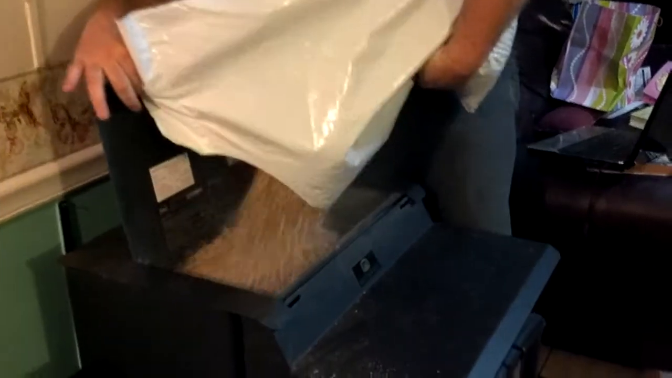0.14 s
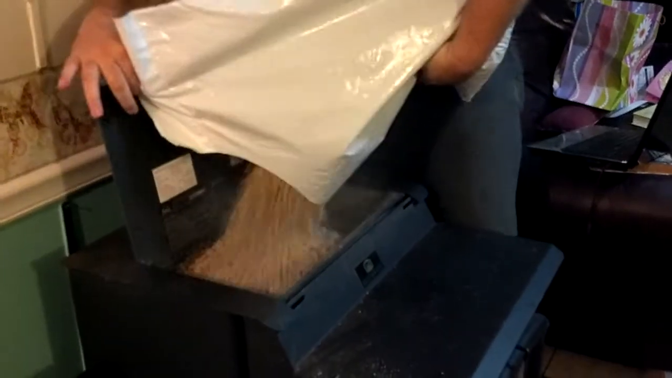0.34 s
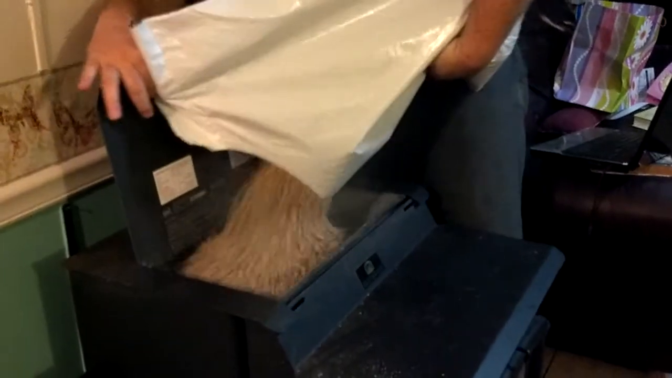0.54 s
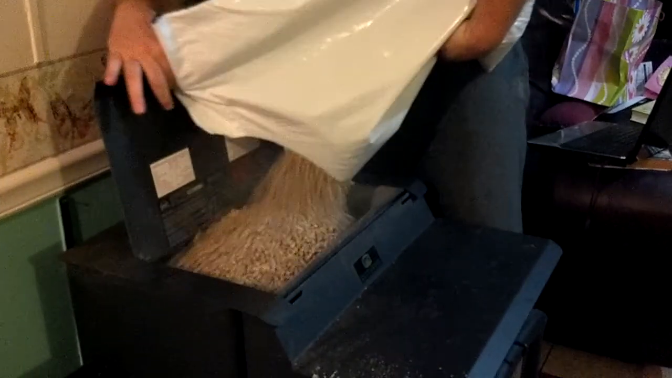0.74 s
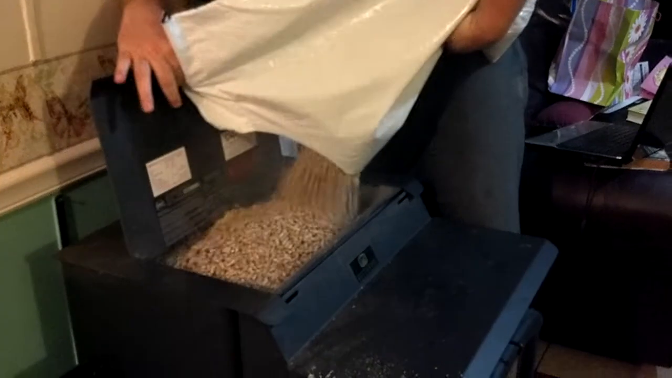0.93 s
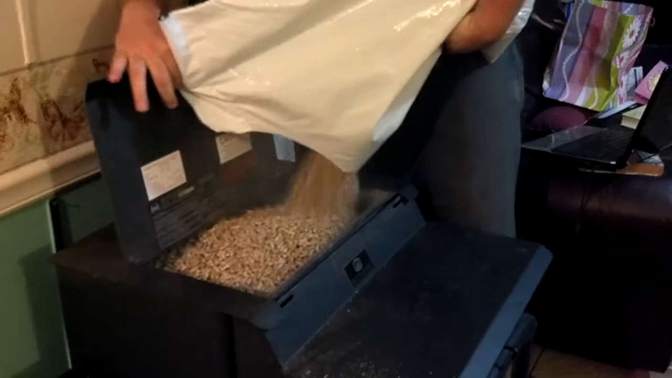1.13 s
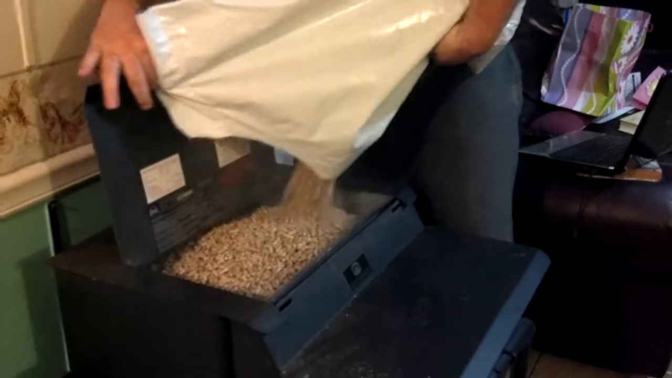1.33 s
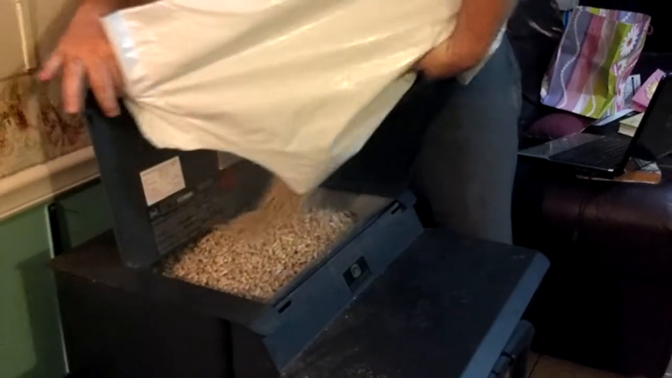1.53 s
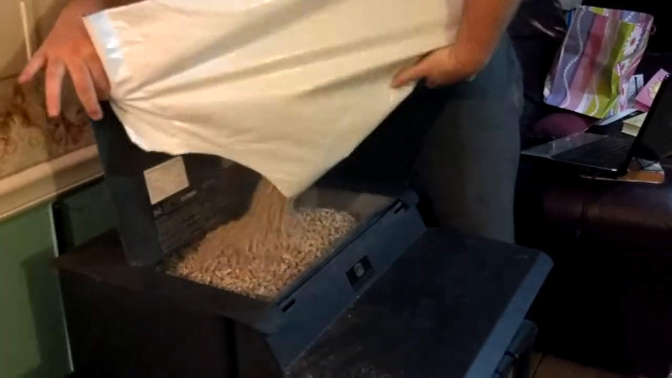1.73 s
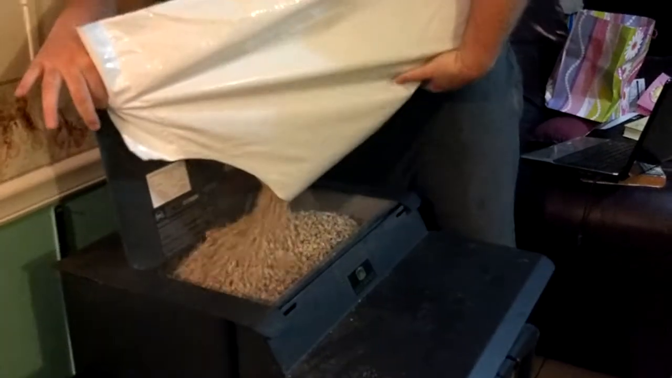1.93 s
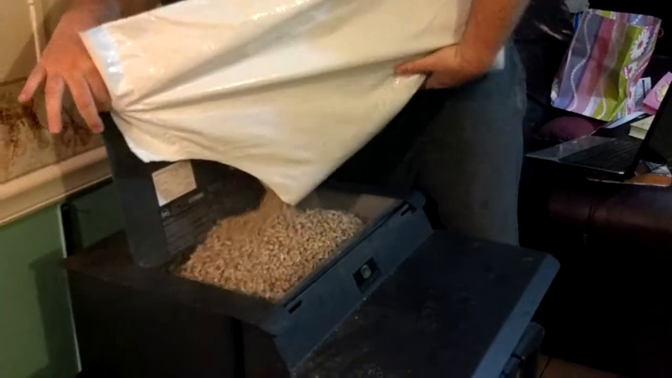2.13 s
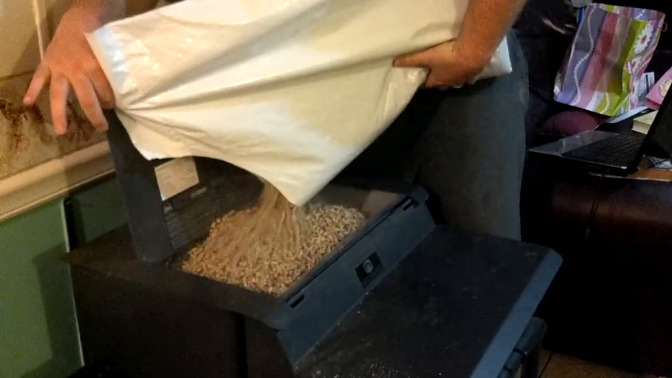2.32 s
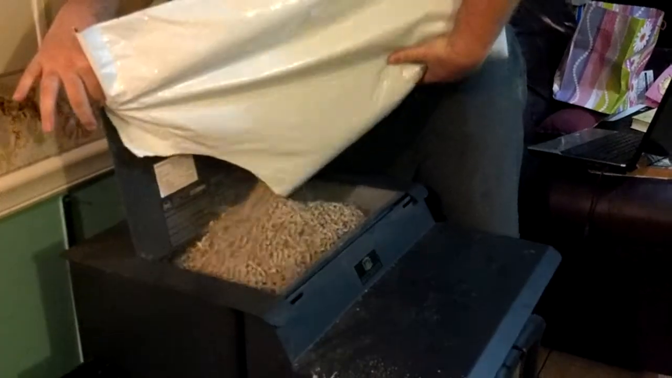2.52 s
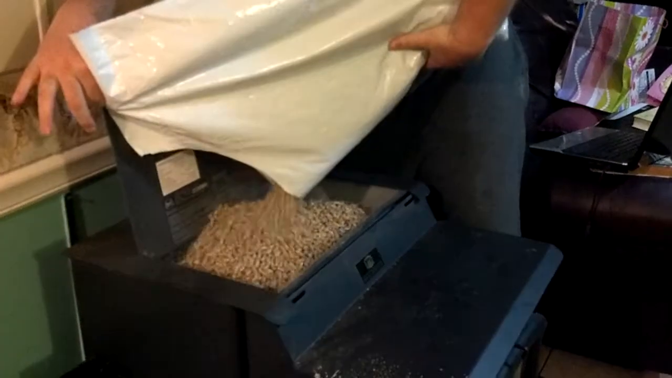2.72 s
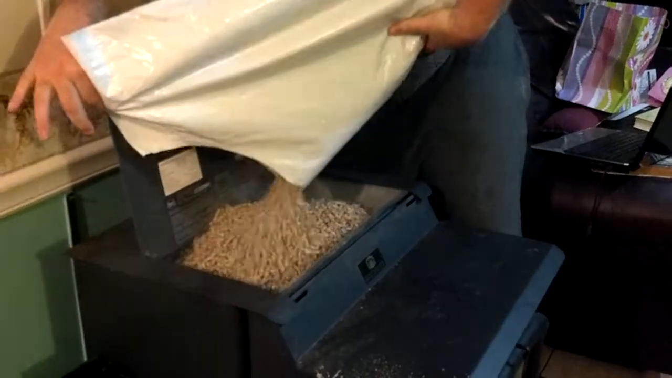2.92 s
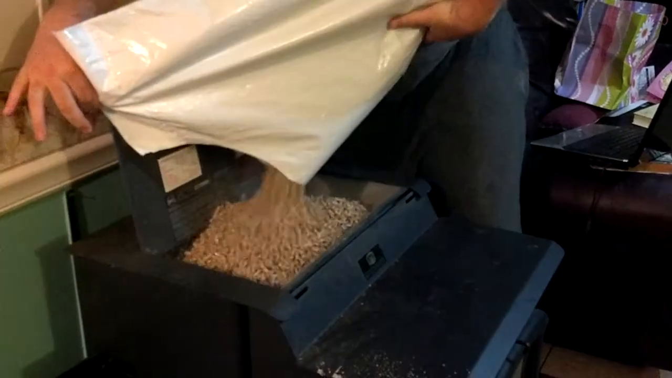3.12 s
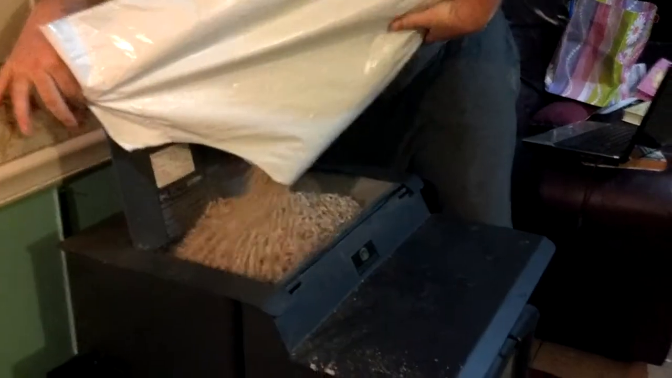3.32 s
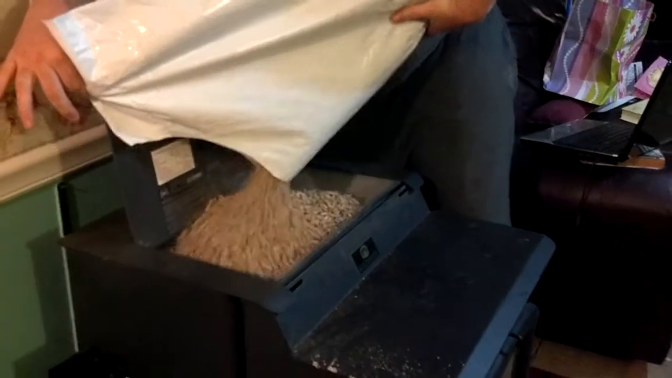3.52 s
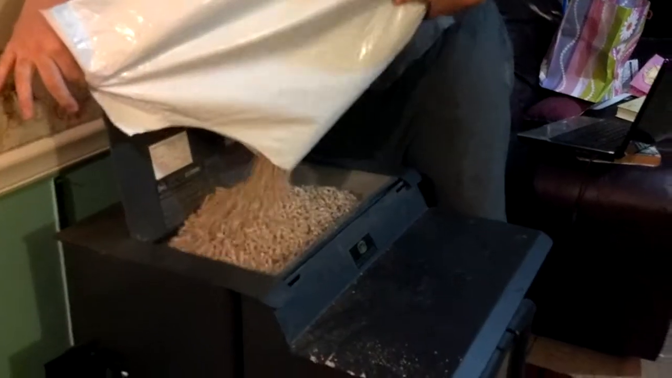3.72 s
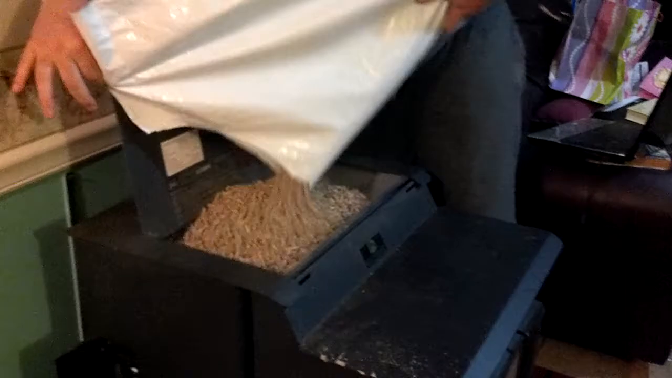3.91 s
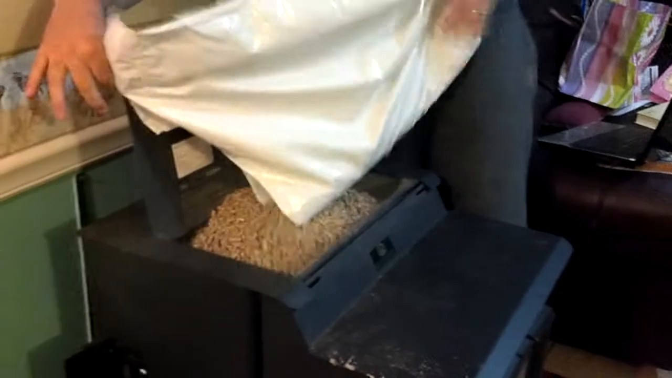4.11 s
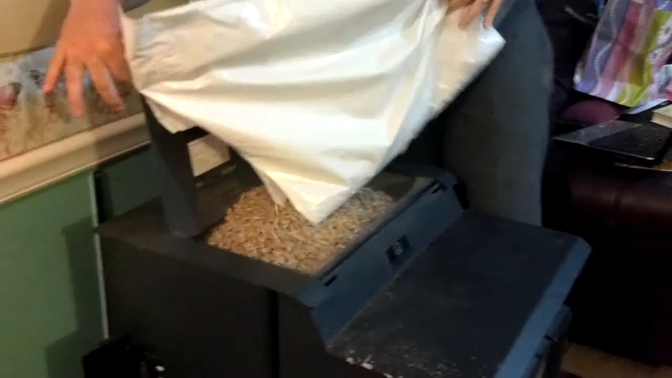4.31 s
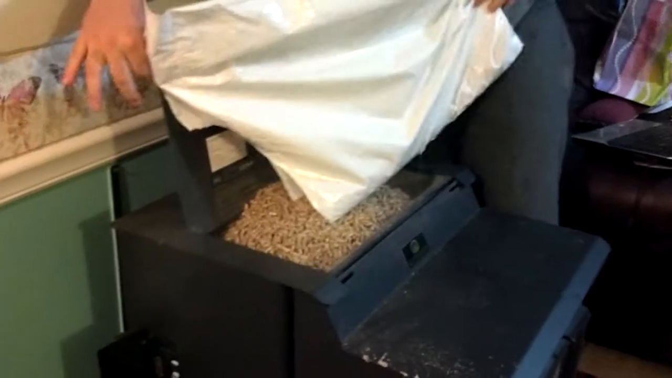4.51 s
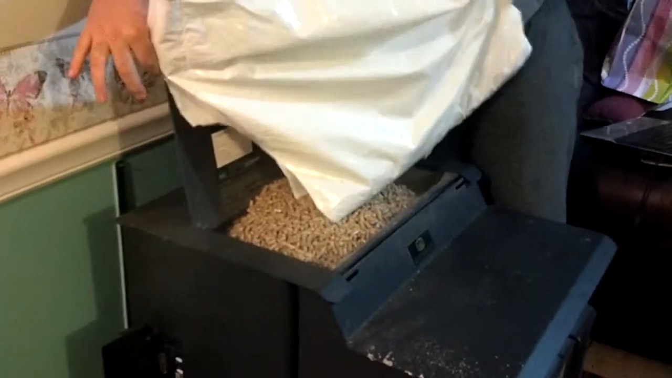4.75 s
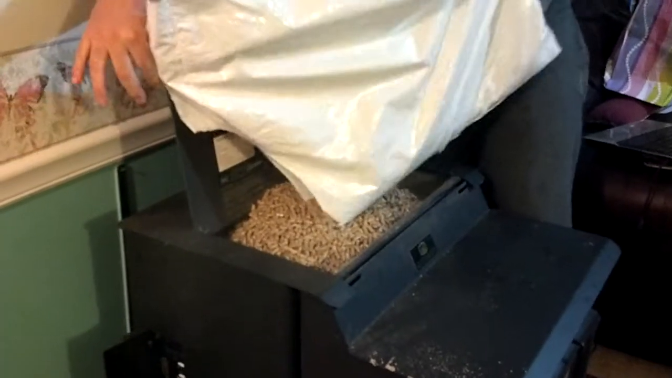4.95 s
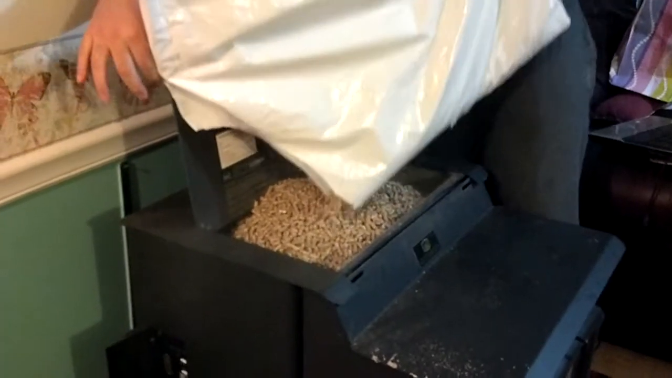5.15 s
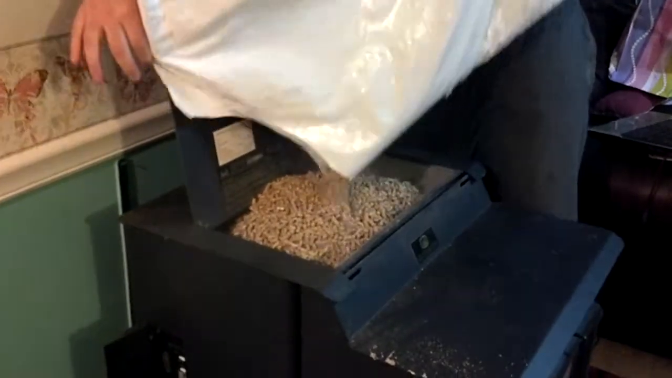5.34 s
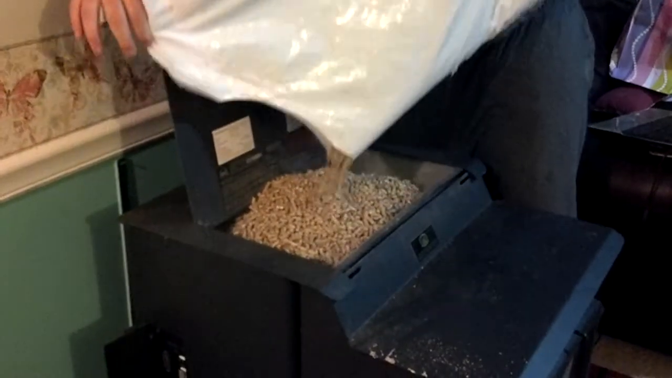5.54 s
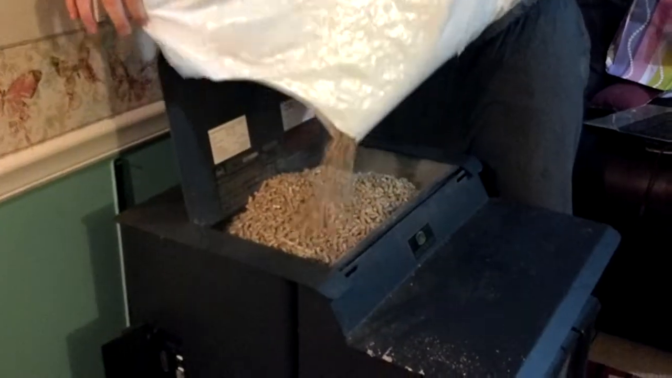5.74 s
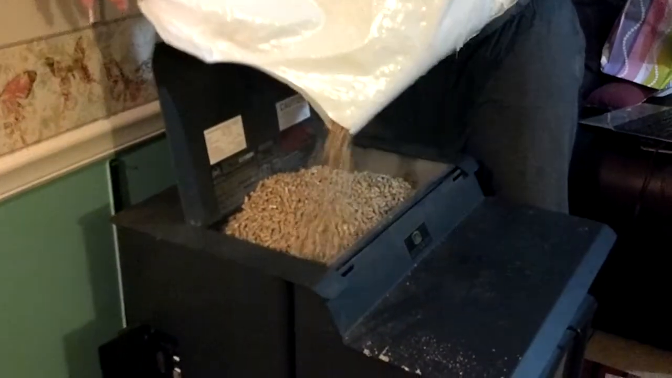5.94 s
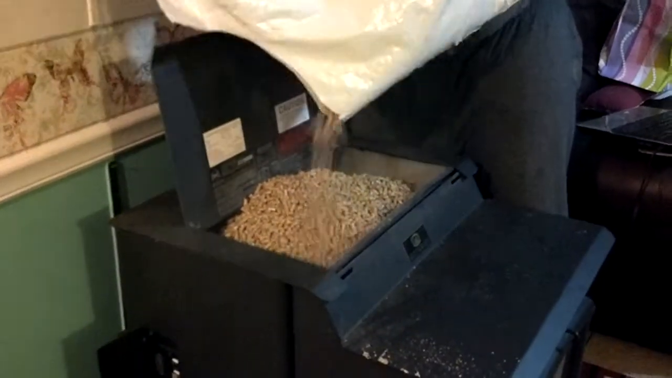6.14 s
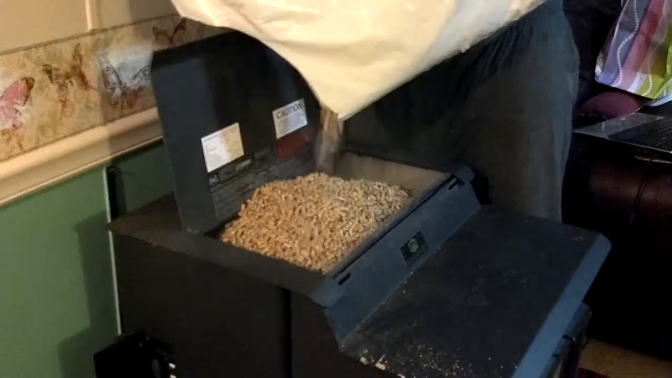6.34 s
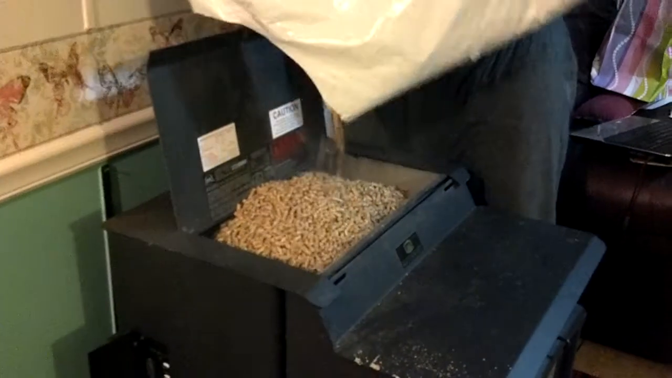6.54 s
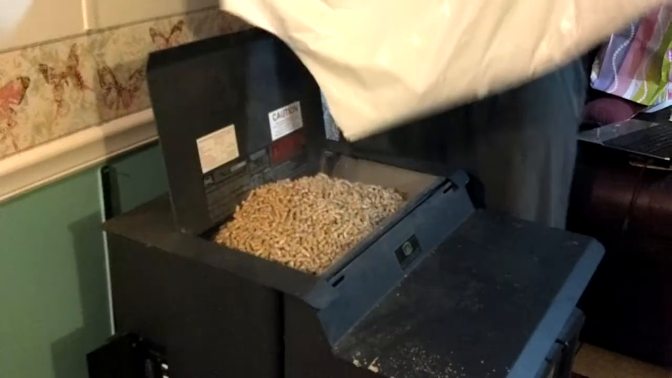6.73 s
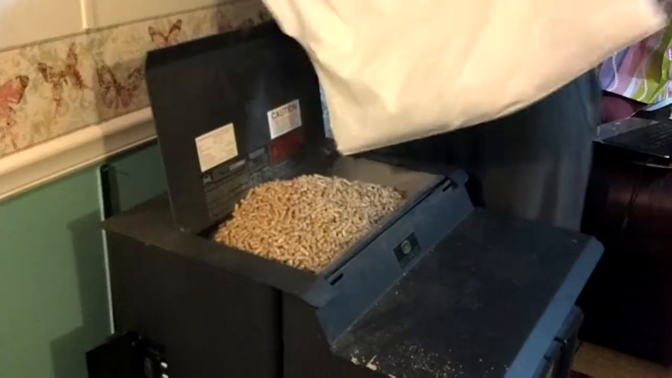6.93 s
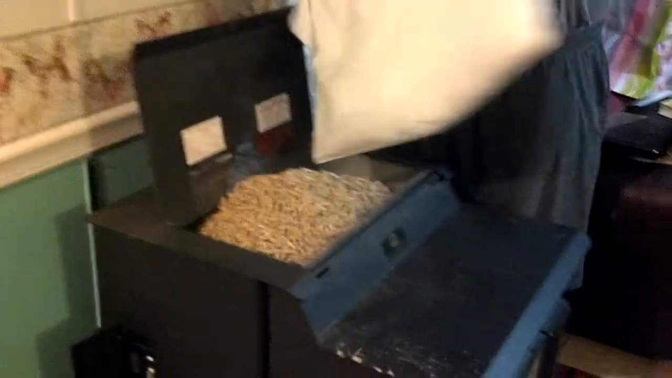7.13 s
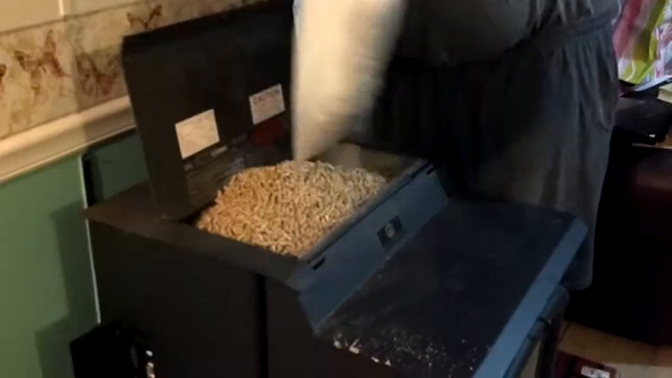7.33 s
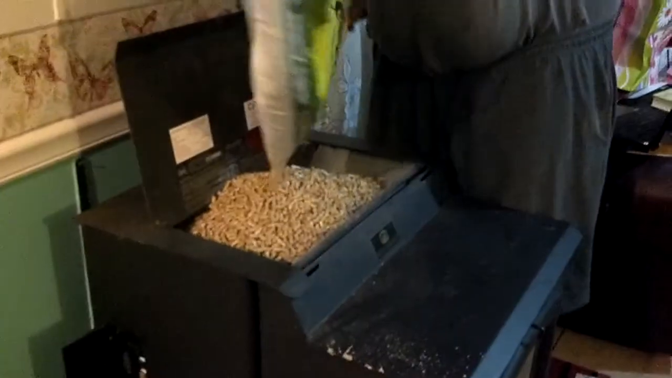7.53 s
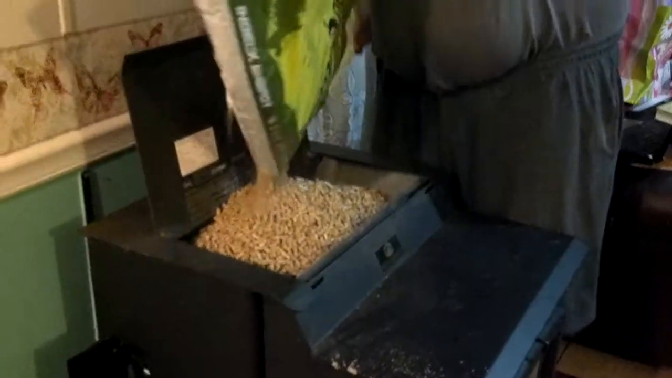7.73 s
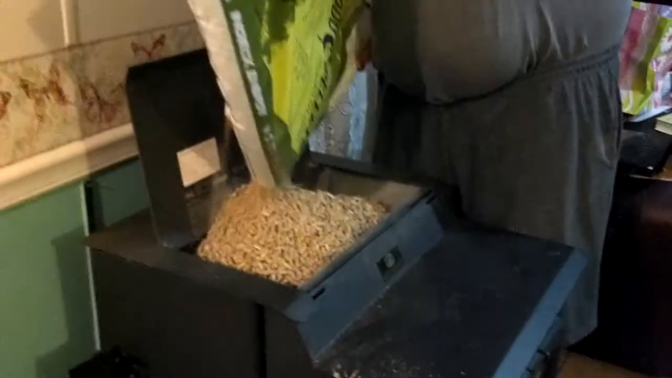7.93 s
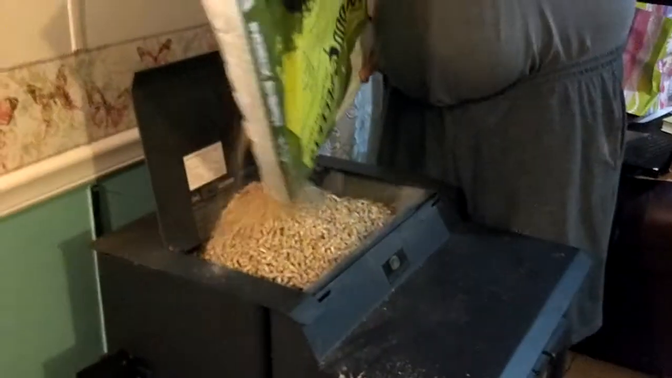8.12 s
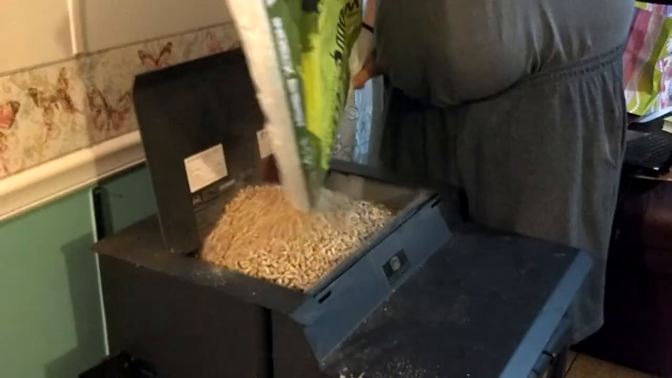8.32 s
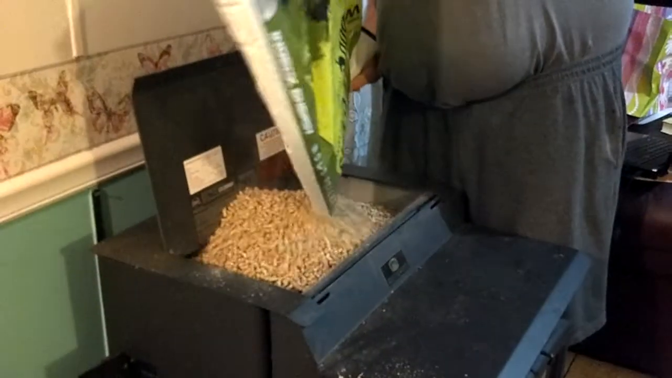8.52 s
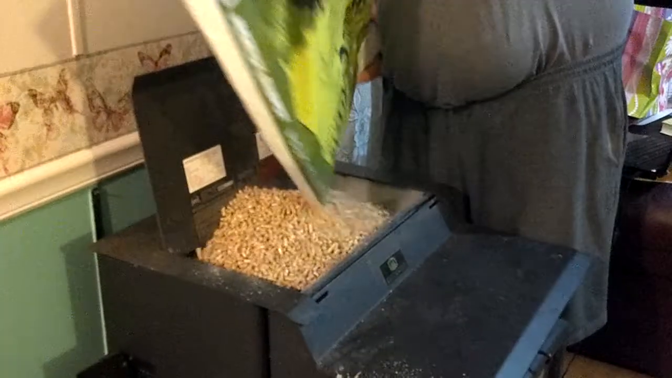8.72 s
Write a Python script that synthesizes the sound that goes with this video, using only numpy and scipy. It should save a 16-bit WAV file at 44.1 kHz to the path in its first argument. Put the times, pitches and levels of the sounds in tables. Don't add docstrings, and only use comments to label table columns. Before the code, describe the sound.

Wood pellets rush from a plastic sack into a steel stove hopper, thinning to single woody knocks and film snaps, then a brief last rush.

```python
import sys
import numpy as np
from scipy import signal
from scipy.fft import rfft, irfft, next_fast_len
from scipy.io import wavfile
from scipy.ndimage import uniform_filter1d

SR = 44100
rng = np.random.default_rng(int(sys.argv[2]) if len(sys.argv) > 2 else 0)


def store_wav(level_fs):
    pcm = np.round(np.clip(np.atleast_2d(level_fs), -1, 1) * 32767)
    wavfile.write(sys.argv[1], SR, pcm.T.astype(np.int16))


def voltage_ratio(decibels):
    exponent = np.asarray(decibels, float) / 20
    return 10 ** exponent


N = 386316

# start_s, flow_db, weight_db (mass sliding on the heap), dust_db
POUR = [(0.0, -31, -0.5, 7.5), (.36, -28.5, -1.5, -3), (.7, -29, -0.5, 2), (.95, -31, -3.5, -3),
        (1.5, -35.5, 4, 1), (2.07, -28, 0.5, -7.5), (2.32, -30, -2.5, -2.5), (2.5, -41.5, 2, 0.5),
        (3.1, -33.5, 1, -0.5), (3.45, -35.5, 1.5, 3.5), (3.95, -35.5, -1, -3), (4.25, -33.5, -5.5, -6),
        (4.7, -52.5, -4, 0.5), (5.6, -44, 4.5, 4), (7.3, -49, -4, 7), (7.66, -39.5, 0.5, 1.5),
        (8.199, -27.5, -9, 2), (8.76, -31, -8, 3)]
# peak_s, level_db, rise_s (per 10 dB), ebb_s (per 10 dB)
SPURTS = [(.04, -28, -1.5, -0.4), (0.22, -25, 0.08, -0.14), (.7, -23.5, -0.02, -0.43),
          (1.0, -32.5, -0.7, 0.43), (1.73, -35, 0.3, -0.3), (1.931, -28.5, 0.04, -0.08),
          (2.239, -34, 0.5, 0.4), (2.531, -35, -0.23, 0.7), (2.68, -41, 0.4, -0.16), (2.96, -54, 1, 1),
          (3.542, -29, 0.16, 0.19), (3.683, -30, 0.1, 0.14), (3.811, -35, 0, 0), (4.02, -41.5, 0.5, 0.6),
          (4.309, -37, 0.24, 0.1), (4.855, -31, 0.04, 0.12), (6.24, -40.5, -0.6, 0.13),
          (7.49, -35.5, -0.39, 0), (8.0, -35, 0.09, 0.2), (8.46, -33, 0.06, 0.05)]
# peak_s, level_db, ebb_s (per 10 dB)
CLUMPS = [(4.475, -34.5, 0.02), (4.739, -40, 0.12), (4.956, -35, 0.07), (5.027, -32, 0.02),
          (5.185, -39.5, 0.2), (5.305, -43, -0.2), (5.482, -39.5, 0.12), (5.508, -39.5, 0.18),
          (5.567, -37.5, 0), (5.695, -39.5, 0), (5.78, -40.5, 0.38), (5.845, -30.5, -0.16),
          (5.99, -41, -0.9), (6.047, -37.5, 0.07), (6.117, -33, 0.08), (6.296, -36, 0.06),
          (6.385, -42, 0.4), (6.458, -35.5, 0.07), (6.586, -30.5, 0), (6.69, -46, -0.5), (6.75, -41, 0.08),
          (6.833, -42, 0.05), (6.971, -44.5, 0), (7.09, -48.5, 0), (6.9, -48.5, 0.2), (7.13, -48, 0.1),
          (7.241, -42, -0.16), (3.668, -32, 0.03), (4.07, -38, 0.08), (7.4, -52, 0.5)]
# freq_hz, level_db (per Hz)
PELLET_COLOUR = [(60, -34), (140, -14.5), (200, -2.5), (260, -3.5), (450, -4.5), (1000, -0.5), (2000, -2.5),
                 (3500, -4.5), (5000, -12), (7000, -6), (8500, -10.5), (11000, -14), (14000, -17.5),
                 (15500, -13.5)]
# freq_hz, width_hz, lift_db
HOPPER_MODES = [(254, 40, 3), (383, 16, 5), (441, 16, 6), (495, 30, 5), (556, 25, 3.5), (728, 70, 1)]
# freq_hz, level_db (per Hz)
FAN_AIR = [(15, -68), (25, 4.5), (70, -11), (130, -12.5), (208, 1.5), (319, -5), (431, -4.5), (620, -10),
           (1160, -15), (2200, -68), (2860, -36), (4840, -120)]
# freq_hz, width_hz, level_db
FAN_TONES = [(120, .03, -64), (294, .3, -60), (242, 30, -62), (436, 16, -63)]
# freq_hz, t60_s
ROOM_T60 = [(500, 0.4), (3000, 0.43), (10000, 0.2)]
# start_s, level_db, pitch_hz, snap (0 wood - 1
KNOCKS = [(.382, -18, 1130, 0.18), (.7639, -21, 1450, 0.74), (1.3095, -18, 1420, 0.26),
          (1.6601, -19, 1240, 0.0026), (2.1255, -22, 1000, 0.003), (2.2874, -14, 1230, .7),
          (2.5241, -13, 1460, 0.28), (2.587, -19, 1410, 0.29), (2.6484, -19, 1360, 0.041),
          (2.6738, -19.5, 1510, 0.15), (2.9566, -18.5, 1290, 0.013), (3.2488, -21, 1310, 0),
          (3.4775, -11.5, 950, 0.57), (3.6631, -20, 1230, 0.67), (3.8038, -24, 1420, 0.34),
          (3.8425, -13, 756, 0.8), (4.0138, -18, 950, 0.16), (4.0657, -12.5, 1850, 0.33),
          (4.0863, -28, 950, 0.7), (4.1305, -17.5, 1420, 0.25), (4.2125, -12.5, 1270, 0.61),
          (4.255, -23, 1270, 0), (4.3858, -21, 1480, 0.98), (4.4172, -64, 1350, 0.6),
          (4.4332, -16, 1790, 0.65), (4.4726, -15.5, 1020, 0.87), (4.5745, -26, 703, 0.76),
          (4.6404, -24, 1440, 0.5),
          (4.733, -36, 1230, 0.72), (4.781, -31, 1120, 0.0068), (4.796, -24, 1280, 0.62),
                 (4.8205, -13, 955, 0.4), (4.843, -30, 1260, 0.15), (4.8654, -7.5, 1240, 0.67),
                 (4.9479, -10.5, 1280, 0.46), (4.9717, -21, 945, 0.21), (5.0142, -34, 1230, 0),
                 (5.1797, -24.5, 1160, 0), (5.2066, -59, 1046, 0.043), (5.2854, -42, 736.8, 0.1),
                 (5.3015, -21.5, 1610, 0), (5.478, -20.5, 1440, 0.071), (5.5026, -15, 1170, 0.054),
                 (5.562, -27, 710, 0), (5.6257, -32, 1590, 0.021), (5.6897, -23, 1490, 0.09),
                 (5.7732, -23, 1210, 0), (5.8412, -15, 1410, 0.37), (5.927, -25, 1020, 1.24),
                 (5.983, -27, 775, 0.39), (6.0416, -18, 930, 0.55), (6.113, -34, 1590, 0.76),
                 (6.2113, -30, 1070, 1), (6.241, -21, 1260, 0.23), (6.2895, -21, 880, 0.4),
          (6.358, -25, 1410, 0.55), (6.379, -25, 750, 0.95), (6.4533, -29, 1160, 0.98),
               (6.582, -24, 890, 0.41), (6.686, -31, 1350, 0.34), (6.8279, -23.5, 734, 0.28),
               (6.967, -24, 1230, 0.31), (7.235, -28, 1080, 0.29), (7.235, -26, 430, 0.19),
               (7.474, -29, 1230, 0.23), (7.7295, -35, 1300, 0.36), (7.816, -22, 1490, 0.3),
               (7.922, -18.5, 1330, 0.29), (7.9667, -19, 1460, 0.74), (8.143, -15, 1280, 0.31),
               (8.559, -22.5, 1320, 0.99), (8.5994, -26, 1390, 0.86)]
# body_db, click_db, crackle_db (against the peak)
WOOD_DB = (-6.5, -23, -38)
FILM_DB = (-24, -4.5, -17)
# start_s, length_s, pitch_hz, level_db
DRONES = [(.755, .225, 3016, -30.5), (1.74, .05, 3016, -31), (.755, .06, 3834, -39), (.76, .045, 9000, -38),
          (.87, .06, 4288, -36), (1.92, .24, 382, -38), (1.84, .27, 492, -37), (1.8, .36, 555, -39),
          (1.91, .1, 250, -42), (1.83, .07, 455, -37), (7.16, .2, 440, -51), (7.22, .05, 450, -43),
          (7.67, .05, 445, -48), (6.8, .2, 480, -50), (7.46, .07, 460, -47), (7.79, .08, 485, -45),
          (3.48, .14, 386, -40), (.55, .2, 382, -41)]
# start_s, crash_db,
# ring_db, favoured_hz, extra_db (of the favoured mode)
CLINKS = [(0.761, -23.5, -45.5, 3834, 19), (.772, -47, -65, 3016, 0), (.83, -28.5, -97.5, 8000, -36),
          (.845, -43, -64, 3016, -2), (.875, -44, -50, 3016, -2), (1.66, -43, -65, 3834, -3),
          (1.598, -32.5, -56.5, 7387, 12), (.9, -45, -56, 3834, 13), (1.724, -29.5, -62, 8195, 0),
          (1.74, -59, -48.5, 3834, 17), (2.6, -37, -60, 6650, 14), (2.682, -23.5, -53, 9436, -21),
          (2.755, -31, -54, 6650, 12), (3.682, -41, -45, 3405, 4.5), (7.963, -28.5, -48, 8940, 30),
          (8.004, -28, -40.5, 3405, -4), (8.048, -36, -63, 7387, 5), (8.102, -33, -54, 6650, 7),
          (.97, -32, -64, 6650, 14), (5.927, -32.5, -73, 6650, 2), (6.108, -32.5, -64, 7200, 2),
          (6.38, -40, -75, 6650, -8), (6.453, -35, -75, 7200, 0), (3.665, -31.5, -55, 3405, 3)]
# freq_hz, level_db, t60_s
RIM_MODES = [(2330, 0.5, 1), (2620, -15, .2), (3016, 4, 0.26), (3405, 7, 0.12), (3460, 6.5, 0.2),
             (3834, 2.5, 0.17), (4270, 1, 0.2), (5270, -23, 0.1808), (5765.3, -9, 0.13), (6650, 2, 0.0862),
             (7387, -7, 0.11), (7200, -3, 0.12), (8000, 1, .1), (8195, 17, 0.092), (8940, -10, 0.094),
             (9436, 7, 0.09), (9300, -2, 0.14)]
# start_s, level_db, pitch_hz
TICKS = [(2.5235, -20, 6900), (2.541, -30, 6700), (2.5989, -19, 6460), (2.6822, -33, 6770),
         (2.6822, -19, 7040), (2.9211, -43, 6400), (3.406, -32, 6350), (3.4774, -29, 6550),
         (3.664, -15, 6140), (3.8116, -21, 6700), (3.8431, -15, 6500), (3.8954, -37, 6290),
         (4.0132, -30, 6710), (4.066, -11, 6460), (4.086, -9, 6800), (4.1773, -20, 6040),
         (4.2127, -9.5, 6400), (4.2541, -45, 6780), (4.3235, -32, 6380), (4.3853, -20, 6800),
         (4.4162, -41, 6440), (4.4327, -16, 6650), (4.4724, -19, 6540), (4.5026, -27, 5990),
         (4.5749, -19, 6600), (4.5978, -24, 6500), (4.6407, -32, 6720), (4.733, -46.5, 6770),
         (4.7954, -38, 7100), (4.8208, -21, 6550), (4.865, -27, 6850), (4.9475, -27.5, 6800),
         (4.992, -18, 6780), (5.0244, -37, 6770), (5.0628, -49, 6400), (5.179, -41, 7000),
         (5.3032, -59, 6140), (5.4768, -25, 6210), (5.5028, -25, 6170), (5.841, -30, 6460),
         (5.9258, -24, 6520), (6.0406, -23, 6770), (6.1129, -18, 6900), (6.3788, -29, 6730),
         (6.4521, -17, 7000), (6.5818, -25, 6740), (6.727, -37, 6130), (6.9665, -33, 6310)]
# start_s, level_db, pitch_hz
TAPS = [(4.472, -20, 1790), (4.64, -32, 1420), (4.708, -36, 1260), (4.733, -27, 1220), (4.821, -22, 960),
        (4.843, -17, 820), (4.865, -17, 1230), (4.948, -19, 1230), (4.971, -28, 926), (5.014, -20, 1030),
        (5.116, -21.5, 800), (5.179, -36, 1160), (5.208, -21.5, 1060), (5.283, -21, 1010),
        (5.301, -46, 1700), (5.345, -25, 1050), (5.477, -19, 1460), (5.503, -10.5, 1230),
        (5.562, -20, 1100), (5.625, -30, 1590), (5.69, -24, 1490), (5.772, -25, 1260), (5.815, -23, 826),
        (5.84, -15, 1340), (5.925, -41, 1030), (5.983, -20.5, 867), (6.042, -28, 918), (6.108, -35, 837),
        (6.241, -24, 1220), (6.276, -20, 853), (6.356, -26, 921), (6.448, -27.5, 1190), (6.577, -27, 856),
        (6.687, -21.5, 1400), (6.743, -41, 1710), (6.829, -23, 1330), (6.905, -35, 939), (6.931, -38, 993),
        (6.967, -41, 1210), (7.03, -39, 1530), (7.085, -28, 1080), (7.129, -31, 1170), (7.149, -36, 1040),
        (7.235, -27, 1080), (7.329, -34, 826), (7.386, -31, 830), (7.401, -27, 1440), (7.422, -28, 969),
        (7.469, -30, 1080)]
# start_s, level_db, pitch_hz
CRACKLES = [(2.4672, -50, 14500), (2.5235, -40, 14500), (2.541, -26, 14200), (2.6842, -30, 11600),
            (3.0773, -30.5, 11400), (4.066, -27, 11800), (4.2127, -15, 11800), (4.2835, -41, 14400),
            (4.3853, -43, 11600), (4.4162, -48, 14400), (4.4327, -28, 11400), (4.4721, -10, 14400),
            (4.6582, -37, 13900), (4.8213, -21, 11800), (4.8647, -15, 11300), (4.9475, -26, 11400),
            (5.1785, -56, 14600), (5.9258, -33, 11400), (6.1124, -33, 11800), (6.2401, -32, 11600),
            (6.2975, -23, 11400), (6.3568, -26, 11600), (6.4347, -29, 14900)]
# freq_hz, likeness (-1..1)
PORTS_ALIKE = [(300, .1), (1500, .12), (2300, .3), (3000, .6), (4200, .25), (5200, 0), (6000, -.25),
               (7200, -.7), (8500, -.7), (9700, -.55), (11000, -.22), (15000, -.25)]
# freq_hz, side_db
SIDE_COLOUR = [(60, 4), (120, 0), (200, -10), (550, -5), (750, -10), (1100, -9.5), (1900, -1.5),
               (10000, 1.2)]

PELLETS_PER_S, FULL_FLOW_DB, THINNING = 14000, -30, .7
SIZE_SPREAD_DB = 2.9
SPURT_THUD, SPURT_RATTLE, SPURT_HISS = -0.38, -0.34, -0.56
FLOW_RATTLE = -0.15
SKITTER_DB, SKITTER_S = 12, 0.043
CLUMP_RISE_S = .006
FAN_DB, ROOM_DB, HISS_DB = -45, -16, -54
SNAP_T60_S, CONTACT_S, LAG_S = .0045, .0005, .0007
DRONE_WAVER_HZ, DRONE_EDGE_S = 6, .02
DUCK_SHARE, DUCK_FROM_DB, RECOVER_DB_PER_S = .45, -42, 9
COMB_SAMPLES, LOW_CUT_HZ, EDGE_HZ = 17, 150, 15800
RIGHT_DB = .4


def evened(x):
    return x / np.sqrt(np.mean(x ** 2) + 1e-20)


def read(points, hz):
    f, value = np.transpose(points)
    return np.interp(np.log(hz + 1), np.log(f + 1), value)


def add(mix, s, sound):
    part = mix[:, round(s * SR):][:, :sound.shape[1]]
    part += sound[:, :part.shape[1]]


def band(x, lo_hz, hi_hz):
    sos = signal.butter(2, [lo_hz, min(hi_hz, .49 * SR)], "band", fs=SR, output="sos")
    return signal.sosfilt(sos, x)


def bump(hz, centre_hz, octaves):
    return np.exp(-.5 * (np.log2((hz + 1) / centre_hz) / octaves) ** 2)


def resonance(hz, centre_hz, width_hz):
    return 1 / (1 + (2 * (hz - centre_hz) / width_hz) ** 2)


def hopper(x):
    size = next_fast_len(N)
    hz = np.fft.rfftfreq(size, 1 / SR)
    lift_db = sum(db * resonance(hz, f, width) for f, width, db in HOPPER_MODES)
    return irfft(rfft(x, size) * voltage_ratio(lift_db), size)[:, :N]


def controls(t):
    s, *columns = np.transpose(POUR)
    steady, weight, dust = (np.interp(t, s, db) for db in columns)
    power = voltage_ratio(2 * steady)
    for at, db, rise, ebb in SPURTS + [(at, db, CLUMP_RISE_S, ebb) for at, db, ebb in CLUMPS]:
        away = np.maximum((at - t) / max(rise, .005), (t - at) / max(ebb, .01))
        power = power + voltage_ratio(2 * (db - 10 * away))
    flow = 10 * np.log10(power)
    spurt = flow - steady
    skitter = sum(voltage_ratio(db + 24.5) * (t > at) * np.exp(-abs(t - at) / SKITTER_S) for at, db, *_ in CLINKS)
    rattle = SPURT_RATTLE * spurt + FLOW_RATTLE * (steady - FULL_FLOW_DB) + SKITTER_DB * np.tanh(skitter)
    return flow, weight + SPURT_THUD * spurt, rattle, dust + SPURT_HISS * spurt


def stream():
    coarse = np.arange(0, N + 64, 64) / SR
    flow = np.interp(np.arange(N) / SR, coarse, controls(coarse)[0])
    rate = PELLETS_PER_S * np.minimum(voltage_ratio(THINNING * (flow - FULL_FLOW_DB)), 1.5)
    hits = rng.random((2, N)) < rate / SR
    hits = hits * voltage_ratio(SIZE_SPREAD_DB * np.minimum(rng.exponential(1, N), 5))

    kind = rng.integers(0, 6, N)
    shapes = rng.standard_normal((6, 128)) * np.exp(-np.arange(128) / 13.7)
    clicks = np.zeros((2, N))
    for k, shape in enumerate(shapes):
        clicks += signal.oaconvolve(hits * (kind == k), evened(shape)[None], axes=1)[:, :N]

    hz, t, z = signal.stft(clicks / np.sqrt(rate), SR, nperseg=512, noverlap=384)
    z /= np.sqrt(uniform_filter1d(np.mean(abs(z) ** 2, (0, 2)), size=3))[:, None]
    patches = uniform_filter1d(rng.standard_normal(z.shape[1:]), size=8, axis=0)
    patches = evened(uniform_filter1d(patches, size=16, axis=1))
    surges = evened(uniform_filter1d(rng.standard_normal(len(t)), size=14))
    colour_db = read(PELLET_COLOUR, hz)[:, None] + 0.76 * patches + 0.95 * surges
    _, thud_db, rattle_db, hiss_db = controls(t)
    for db, centre_hz, octaves in ((thud_db, 330, .8), (rattle_db, 6500, .75), (hiss_db, 15000, .4)):
        colour_db += bump(hz, centre_hz, octaves)[:, None] * (db - db.mean())
    level = signal.istft(z * voltage_ratio(colour_db), SR, nperseg=512, noverlap=384)[1][:, :N]
    return voltage_ratio(flow + 5.0) * evened(hopper(level))


def fan(duck):
    size = next_fast_len(N)
    hz = np.fft.rfftfreq(size, 1 / SR)

    def shaped(gain):
        noise = rfft(rng.standard_normal((2, size)))
        return evened(irfft(noise * gain, size)[:, :N])

    air = duck * voltage_ratio(FAN_DB) * hopper(shaped(voltage_ratio(read(FAN_AIR, hz))))
    return air + sum(voltage_ratio(db) * shaped(resonance(hz, f, width)) for f, width, db in FAN_TONES)


def room(x):
    echoes = np.zeros((2, SR // 2))
    at = np.arange(200, SR // 2 - 20, 20) + rng.integers(0, 20, (2, (SR // 2 - 201) // 20))
    np.put_along_axis(echoes, at, rng.choice([-1., 1.], at.shape), 1)
    hz, t, z = signal.stft(echoes, SR, nperseg=256)
    decay = voltage_ratio(-60 * t / read(ROOM_T60, hz)[:, None])
    tail = signal.istft(z * decay, SR, nperseg=256)[1]
    return signal.fftconvolve(x, tail / np.linalg.norm(tail[0]), axes=1)[:, :N]


def knocks():
    out, t = np.zeros((2, N)), np.arange(2500) / SR
    rows = KNOCKS
    noise = rng.standard_normal((len(rows), 4, 2, len(t)))
    wood = evened(band(noise[:, 0], 880, 3600))
    bounce = evened(band(noise[:, 1], 730, 3180))
    film = evened(band(noise[:, 2], 5800, 8000))
    fine = evened(band(noise[:, 3], 10000, 18000))
    burst = voltage_ratio(-60 * t / 0.009) * np.minimum(t / 0.0002, 1)
    crack = 1.64 * voltage_ratio(-60 * t / SNAP_T60_S)
    for k, (s, peak_db, hz, snap) in enumerate(rows):
        body_db, click_db, crackle_db = (1 - snap) * np.array(WOOD_DB) + snap * np.array(FILM_DB)
        tapped, ticked = (min(abs(s - row[0]) for row in lone) < .004 for lone in (TAPS, TICKS))
        tone = (not tapped) * np.sin(2 * np.pi * hz * t) * voltage_ratio(-60 * t / 0.023)
        body = tone + 0.62 * wood[k] * burst
        scatter = 0.48 * bounce[k] * voltage_ratio(-60 * t / 0.09)
        click = film[k] * (crack / (1 + 2 * ticked) + 0.089 * voltage_ratio(-60 * t / 0.1))
        crackle = fine[k] * (crack + 0.16 * burst)
        knock = voltage_ratio(body_db + 6.5) * (body + scatter)
        knock = knock + voltage_ratio(click_db + 8.5) * click + voltage_ratio(crackle_db + 9.5) * crackle
        add(out, s + LAG_S, voltage_ratio(peak_db) * knock)
    return out


def drones():
    out, t = np.zeros((2, N)), np.arange(22050) / SR
    for s, length, hz, db in DRONES:
        waver = evened(uniform_filter1d(rng.standard_normal((2, len(t))), size=600))
        gate = np.clip(np.minimum(t, length - t) / DRONE_EDGE_S, 0, 1)
        tone = np.sin(2 * np.pi * np.cumsum(hz + DRONE_WAVER_HZ * waver[0]) / SR)
        add(out, s, voltage_ratio(db + 3 + 3 * waver[1]) * gate * tone * np.ones((2, 1)))
    return out


def rim():
    out, t = np.zeros((2, N)), np.arange(12000) / SR
    hz, db, t60 = np.transpose(RIM_MODES)
    phase = rng.random(len(hz))
    swing = voltage_ratio(-60 * t / t60[:, None]) * np.exp(2j * np.pi * hz[:, None] * t) * np.minimum(t / 0.022, 1)
    rattle = np.minimum(t / .003, 1) * (1 / (1 + (t / .011) ** 6) + .35 * voltage_ratio(-60 * t / .12))
    for s, crash_db, ring_db, favoured_hz, extra_db in CLINKS:
        crash = evened(band(rng.standard_normal((2, len(t))), 5500, 10600)) * rattle
        in_step = np.exp(2j * np.pi * (hz * round(s * SR) / SR + phase)) * np.ones((2, 1))
        mode_db = db + 5.5 * (rng.random(len(hz)) + 1.0) + extra_db * bump(hz, favoured_hz, 0.023)
        ring = ((voltage_ratio(mode_db) * in_step) @ swing).real
        add(out, s, voltage_ratio(crash_db) * crash + voltage_ratio(ring_db) * ring)
    return out


def strays():
    out, t = np.zeros((2, N)), np.arange(1500) / SR
    onset = np.minimum(t / CONTACT_S, 1) ** 2
    # rows, trim dB, t60 s
    for rows, trim_db, t60 in ((TICKS, 1.5, .006), (TAPS, -0.5, .013), (CRACKLES, -3, .0074)):
        for s, peak_db, hz in rows:
            puff = evened(band(rng.standard_normal((2, len(t))), 0.33 * hz, 1.14 * hz))
            ring = 0.9 * np.sin(2 * np.pi * hz * t) + .25 * puff
            add(out, s + LAG_S, voltage_ratio(peak_db + trim_db - 60 * t / t60) * onset * ring)
    return out


def gain_control(pour):
    level_db = 10 * np.log10(abs(uniform_filter1d(pour[0] ** 2, size=8000)) + 1e-12)
    creep = np.arange(N) * RECOVER_DB_PER_S / SR
    held_db = np.maximum.accumulate(level_db + creep) - creep
    return voltage_ratio(-DUCK_SHARE * np.maximum(held_db - DUCK_FROM_DB, 0))


def scene():
    pour, hits = stream(), knocks() + rim()
    echo = voltage_ratio(ROOM_DB) * room(hits + voltage_ratio(3.5) * pour)
    return pour + hits + echo + fan(gain_control(pour)) + strays() + drones()


def roll_off(x):
    return signal.sosfilt(signal.butter(12, 16490, fs=SR, output="sos"), x)


def record(dry):
    size = next_fast_len(N + 4096)
    hz = np.fft.rfftfreq(size, 1 / SR)
    first, other = rfft(dry + voltage_ratio(HISS_DB) * rng.standard_normal(dry.shape), size)
    alike = np.clip(read(PORTS_ALIKE, hz), -1, 1)
    second = alike * first + np.sqrt(1 - alike ** 2) * other
    angle = np.pi * hz * COMB_SAMPLES / SR
    mid = first * np.sin(np.maximum(angle, np.pi / 2))
    side = 1j * second * np.cos(angle) * voltage_ratio(read(SIDE_COLOUR, hz))
    edge = np.where(hz < EDGE_HZ, 1, voltage_ratio(-48.0 - 10.0 * (hz - EDGE_HZ) / 1000))
    edge = edge / np.sqrt(1 + (LOW_CUT_HZ / (hz + 1)) ** 4)
    wide = irfft(np.array([mid + side, mid - side]) * edge, size)[:, :N]
    return roll_off(wide * voltage_ratio(np.array([[-RIGHT_DB / 2], [RIGHT_DB / 2]])))


dry = scene()
out = record(dry)
store_wav(out)
```